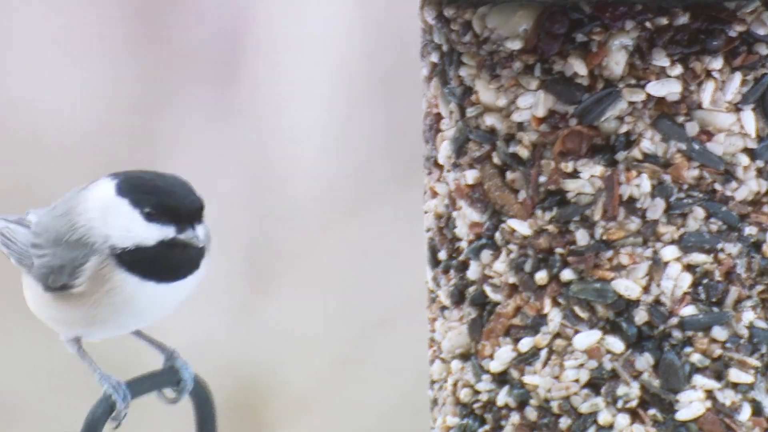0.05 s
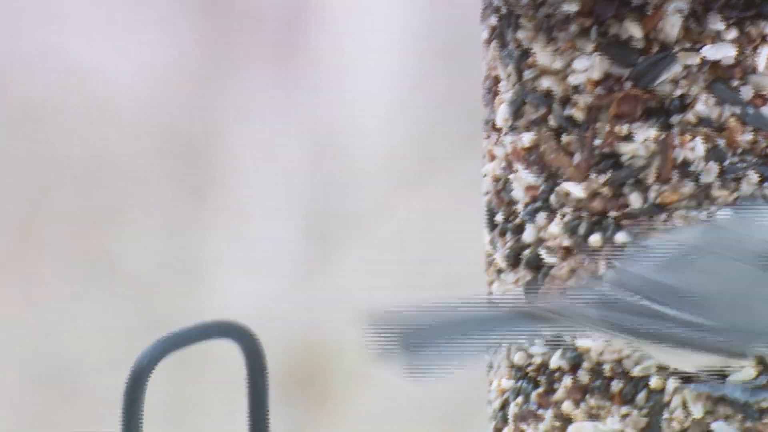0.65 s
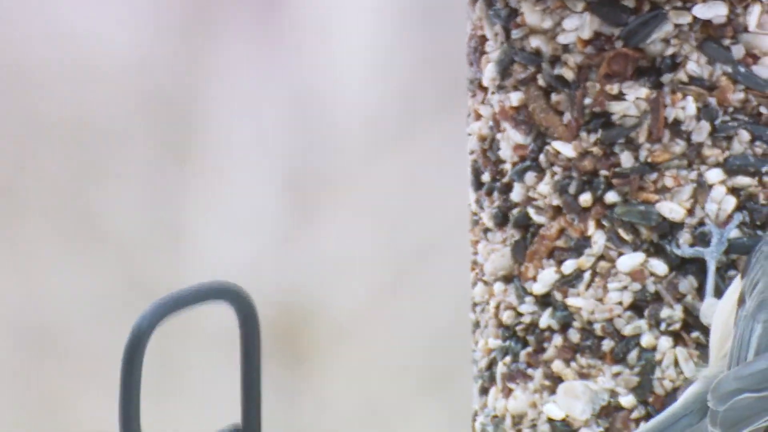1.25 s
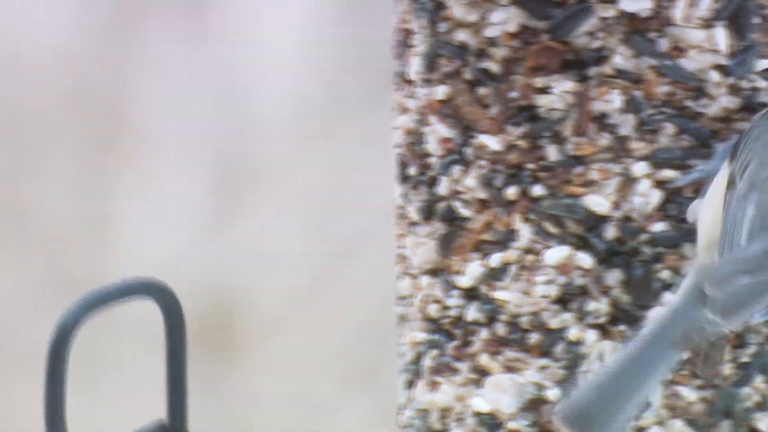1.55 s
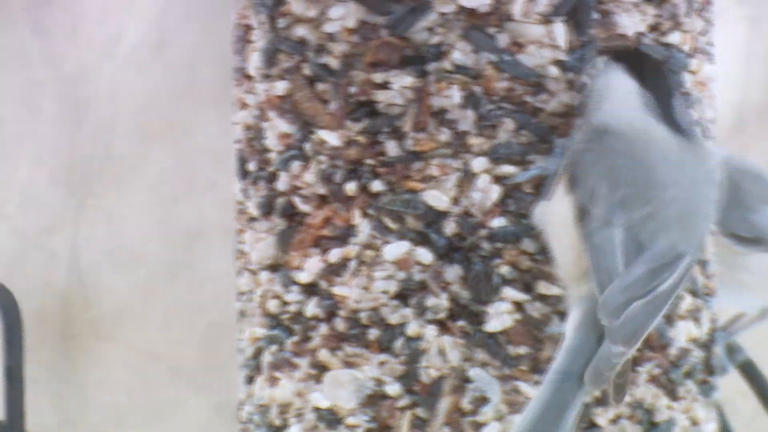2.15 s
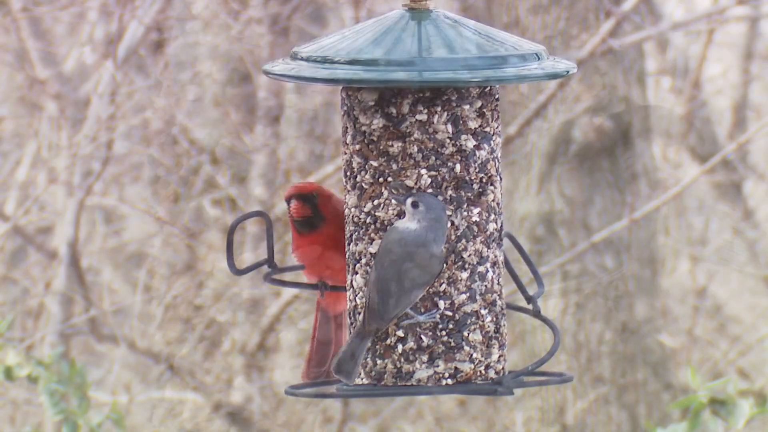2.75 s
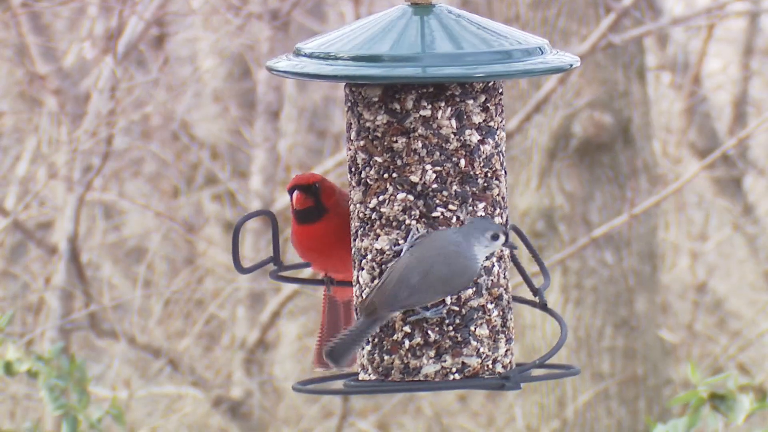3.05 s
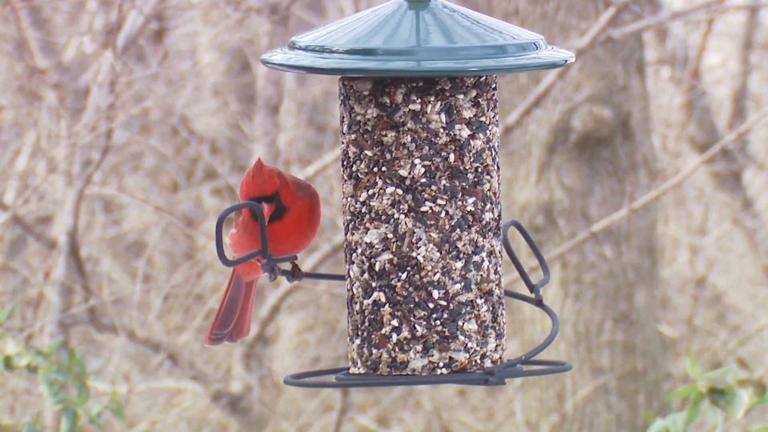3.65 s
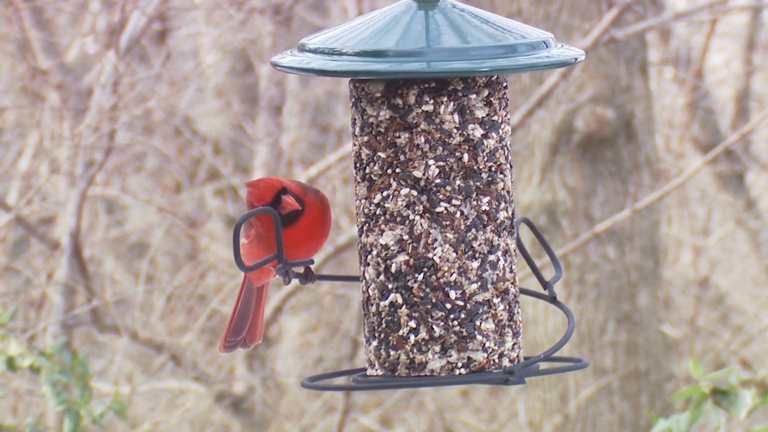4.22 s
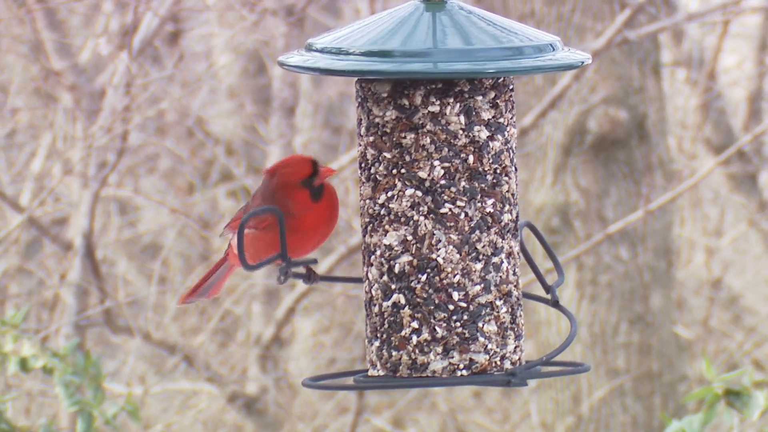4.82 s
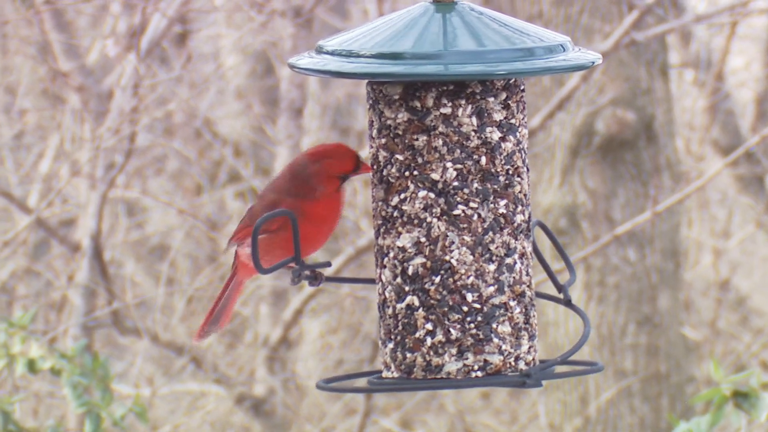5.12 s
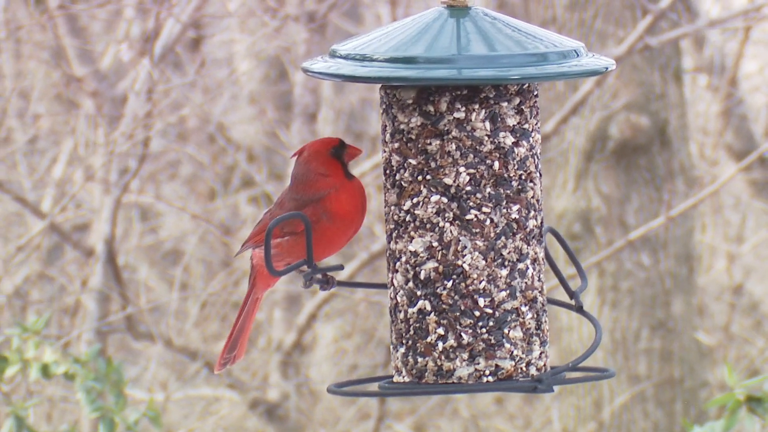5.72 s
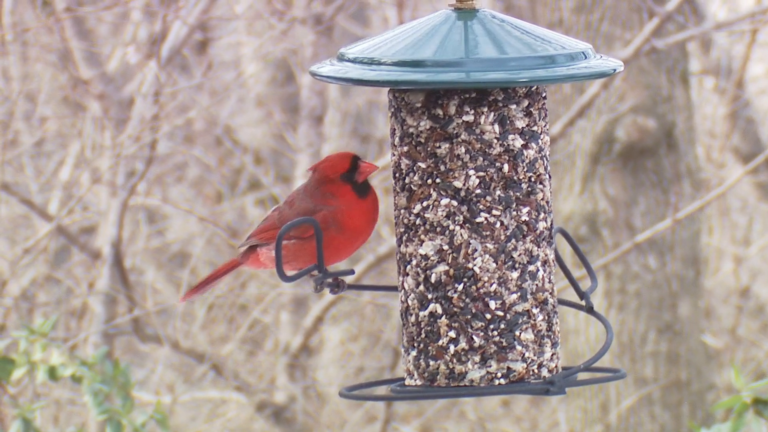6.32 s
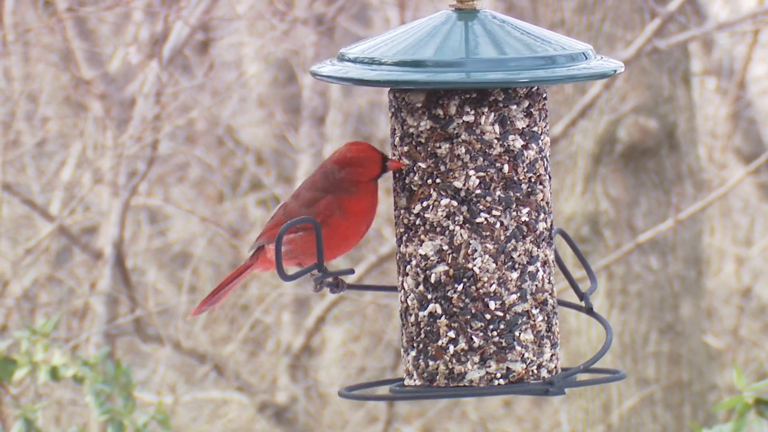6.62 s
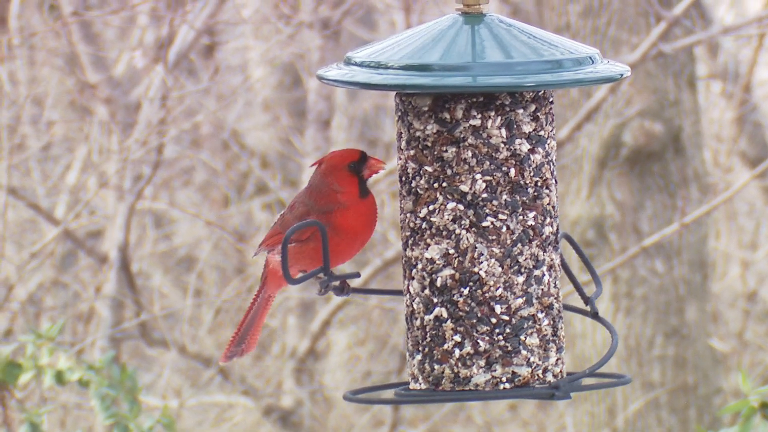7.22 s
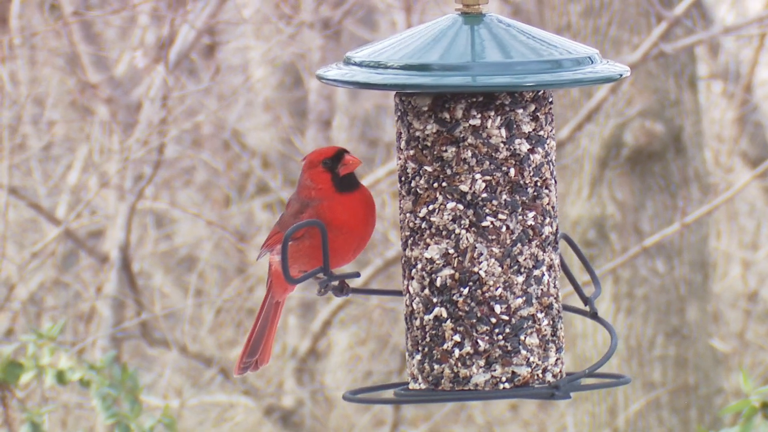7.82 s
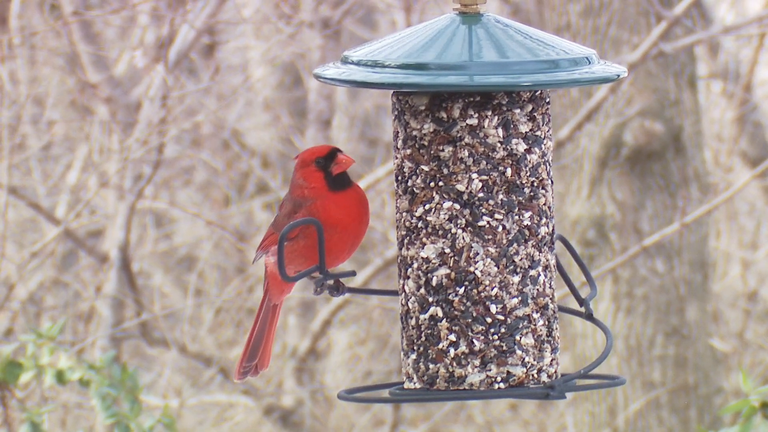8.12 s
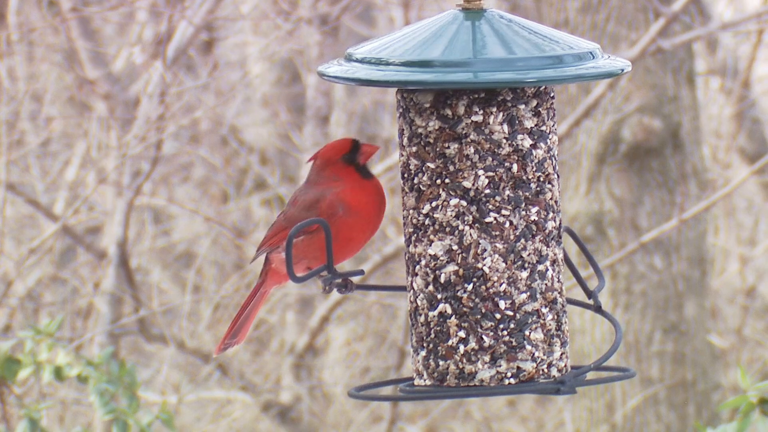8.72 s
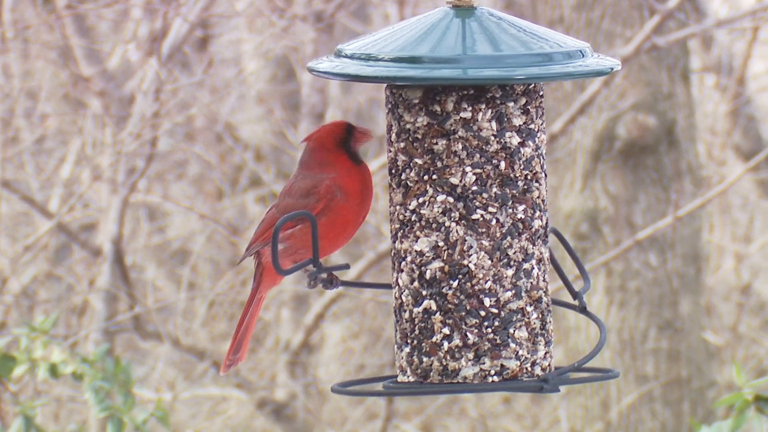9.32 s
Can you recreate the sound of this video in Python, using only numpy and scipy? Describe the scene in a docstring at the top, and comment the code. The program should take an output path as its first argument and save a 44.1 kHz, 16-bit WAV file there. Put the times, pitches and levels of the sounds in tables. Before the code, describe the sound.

A steady, high insect hiss and soft outdoor air sit on the left throughout, while faint whistles, warbles and thin calls echo from a wood. Small birds at a feeder close on the left give sharp, rising chips, strongest at about 1.5, 3.5, 7 and 9 seconds. At 2.5 seconds a nearby chickadee gives one bright arched note and three nasal, buzzy notes. In the centre another bird whistles long, falling mews that flutter into a buzz: once at 1 second, three times between 3.4 and 4.8, and again at 6.4. A beak cracks seeds softly near 1.8 seconds and three times around 5. Three tiny high ticks follow between 5.5 and 6.1. A lower, plain whistle comes from the trees at 7.2 seconds, and a short, faint flutter of wings passes around 9.

```python
"""A garden feeder and a wood: two layers of birdsong, the feeder close on the left, the wood in the centre.
At the feeder sharp rising chips ring through the trees, a chickadee gives one chick-a-dee-dee-dee and
seeds crack, over a steady insect hiss. In the wood a bird whistles long, falling mews that flutter into a
buzz; farther off others warble and whistle, and wings beat near the end. Each bird's voice is a gliding
tone from its syrinx, scattered back by branches and trunks; the wings and seeds are bursts of noise."""
import sys
import numpy as np
from scipy import signal
from scipy.fft import rfft, irfft, next_fast_len
from scipy.io import wavfile
from scipy.ndimage import uniform_filter1d, map_coordinates

SR = 44100
rng = np.random.default_rng(int(sys.argv[2]) if len(sys.argv) > 2 else 0)


def int16_out(signal):
    """Quantize to a 16-bit WAV file."""
    q = np.round(np.clip(np.atleast_2d(signal).T, -1, 1) * 32767)
    wavfile.write(sys.argv[1], SR, q.astype(np.int16))


N = 421596

# partials of the near chips and the far calls: (multiple of the pitch, level [dB])
HIGH_CALL_PARTIALS = [(.5, -23), (1, 3.5), (1.5, -23), (2, -34)]


def amp(db):
    """Decibels to gain."""
    return 10 ** (np.asarray(db) / 20)


def unit(x):
    """Scale to rms 1."""
    return x / np.sqrt(np.mean(x ** 2) + 1e-20)


def along(points, hz):
    """(frequency [Hz], value) points read on a log axis."""
    f, v = np.transpose(points)
    return np.interp(np.log(hz + 1), np.log(f + 1), v)


def clock(length):
    """Sample times of a sound this many seconds long."""
    return np.arange(max(int(length * SR), 2)) / SR


def wobble(rate, size):
    """A smooth random curve, rate knots a second."""
    return map_coordinates(rng.standard_normal(int(size * rate / SR) + 4), [np.arange(size) * rate / SR])


def filtered(x, response):
    """x through a gain that depends on frequency."""
    m = next_fast_len(N + SR // 2)
    return irfft(rfft(x, m) * response(np.fft.rfftfreq(m, 1 / SR)), m)[..., :N]


def noise(spectrum):
    """Noise with a spectrum of (frequency [Hz], density [dB per Hz]) points."""
    return filtered(rng.standard_normal(N) * np.sqrt(SR / 2), lambda hz: amp(along(spectrum, hz)))


def add(track, s, sound):
    """Mix a sound into a track at time s."""
    room = track[max(round(s * SR), 0):][:len(sound)]
    room += sound[:len(room)]


def gate(t, rise, fall):
    """Smooth start and end of a note, in seconds."""
    return np.sin(np.pi / 2 * np.clip(t / rise, 0, 1) * np.clip((t[-1] - t) / fall, 0, 1)) ** 2


def glide(t, start_hz, oct_per_s):
    """A pitch that slides at an even musical speed."""
    return start_hz * 2 ** (oct_per_s * t)


def contour(rows):
    """Time, pitch and level of a note, sample by sample."""
    s, hz, db = np.transpose(rows)
    t = clock(s[-1] - s[0])
    return t, np.interp(t, s - s[0], hz), np.interp(t, s - s[0], db)


def syrinx(hz, partials=((1, 0),)):
    """A tone that follows a pitch curve, pure or with (multiple, level [dB]) partials."""
    phase = 2 * np.pi * np.cumsum(hz) / SR
    return np.sqrt(2) * sum(amp(db) * np.sin(k * phase) for k, db in partials)


def trees(note, echo_db, near_t60=0.67, far_t60=1.0, far_db=-11, delay=0.0049):
    """A note and its scatter: quickly from near branches, slowly from far trunks."""
    t = clock(.6)
    decay = (amp(-60 * t / near_t60) + amp(far_db - 60 * t / far_t60)) * (t > delay)
    tail = rng.standard_normal(len(t)) * decay
    return signal.fftconvolve(note, (t == 0) + amp(echo_db) * tail / np.linalg.norm(tail))


def hush():
    """A faint background hush is faded in early on, then holds."""
    # the full hush: (frequency [Hz], density [dB per Hz])
    spectrum = [(25, -104), (100, -95), (250, -114), (550, -104), (1000, -106), (2400, -106), (3100, -101),
                (4200, -105), (5000, -114), (9000, -119), (15000, -130)]
    fade_db = np.interp(np.arange(N) / SR, [1.5, 3.2], [-7, 0])
    return noise(spectrum) * amp(fade_db)


def air():
    """Steady, low open-air noise around the feeder."""
    # garden air: (frequency [Hz], density [dB per Hz])
    spectrum = [(25, -81), (80, -84), (150, -97.5), (215, -88), (300, -78.5), (460, -77), (580, -83.5),
                (800, -84.5), (1200, -89.5), (2000, -93), (4000, -92), (10000, -103), (12500, -109),
                (15500, -112)]
    return noise(spectrum)


def insects(pitch_hz=5560, pulse_hz=17.7, droop=.065, trill_db=-50, shimmer_db=1.8):
    """A chorus blurs into a shimmering hiss; one nearer insect pulses, each pulse sagging in pitch."""
    # the chorus: (frequency [Hz], density [dB per Hz])
    spectrum = [(3800, -108), (4500, -87.5), (5000, -81), (5500, -76), (6100, -79), (7400, -87.5),
                (8000, -94.5), (9000, -110)]
    # slow drift of all the insects: (time [s], gain [dB])
    swell = [(0, 0), (1.5, 0.5), (2, -1.5), (9.5, -1)]
    hiss = noise(spectrum)
    treble = filtered(hiss, lambda hz: np.clip((hz - 6000) / 700, 0, 1))
    shimmer = treble * (amp(shimmer_db * wobble(20, N)) - 1)
    cycle = np.cumsum(pulse_hz * (1 + 0.0188 * wobble(3.9, N))) / SR % 1
    pulses = np.sin(np.pi * cycle) ** 2 * (1 + .3 * wobble(150, N))
    trill = syrinx(pitch_hz * (1 + droop * (.5 - cycle) + .006 * wobble(200, N))) * pulses
    swell_db = np.interp(np.arange(N) / SR, *np.transpose(swell))
    return amp(swell_db) * (hiss + shimmer + amp(trill_db) * trill)


def warble(db, echo_db, pitch=1, low_hz=3490, high_hz=4610, arch_s=.053, sink=.14, grows_db=6):
    """Two quick, broken arches of pitch that sink and grow louder toward the end."""
    t = clock(2 * arch_s)
    arches = low_hz + (high_hz - low_hz) * np.abs(np.sin(np.pi * t / arch_s))
    hz = pitch * arches * (1 - sink * t / t[-1]) * (1 + .05 * wobble(110, len(t)))
    level = amp(db + grows_db * t / t[-1] + 6.5 * wobble(92.3, len(t)))
    return trees(syrinx(hz) * level * gate(t, 0.044, 0.002), echo_db)


def warblers(chorus_db=-74, count=14):
    """A few clear warbles, and a scatter of lower, fainter ones deep in the wood."""
    # the clear warbles: (time [s], base level [dB])
    notes = [(1.903, -65.5), (5.6, -63.5), (5.75, -67.5), (6.226, -63), (6.63, -66), (7.756, -65),
             (8.409, -70)]
    out = np.zeros(N)
    for s, db in notes:
        add(out, s, warble(db, echo_db=-6))
    for when, pitch, size in rng.random((count, 3)):
        add(out, 3.3 + 6.2 * when, warble(chorus_db + 6 * size, echo_db=0, pitch=.7 + .25 * pitch))
    return out


def twitter(start_s=.43, gap_s=.087, pitch_hz=2354, first_db=-65.5, step_db=0.9, uneven_db=2, count=8):
    """Some way off, an even run of soft low notes grows louder."""
    out, t = np.zeros(N), clock(0.044)
    for k in range(count):
        db = first_db + step_db * k + uneven_db * rng.standard_normal()
        note = syrinx(pitch_hz * (1 + 0.0204 * wobble(44, len(t)))) * amp(db)
        add(out, start_s + k * gap_s, trees(note * gate(t, .01, 0.024), echo_db=-2))
    return out


def whistles(length_s=0.24, sag_hz_per_s=344, waver=0.0048):
    """Plain whistles from the wood, high or an octave lower, that all last as long and sag alike."""
    # nearly level whistles: (time [s], start pitch [Hz], level [dB], echo [dB])
    notes = [(0.109, 3060, -65.5, 0), (1.696, 3097, -62, -2), (2.739, 1607, -61, -6),
             (5.87, 1623, -64.5, 2.5), (5.95, 3090, -60, -9), (7.241, 1602, -47, -8.5),
             (8.346, 3140, -62, 2)]
    out, t = np.zeros(N), clock(length_s)
    for s, pitch_hz, db, echo_db in notes:
        hz = (pitch_hz - sag_hz_per_s * t) * (1 + waver * wobble(300, len(t)))
        note = amp(db) * syrinx(hz, [(1, 0.5), (2, -24.0)])
        add(out, s, trees(note * gate(t, 0.028, .03), echo_db))
    return out


def slurs(oct_per_s=-3.4, rasp=0.0176, echo_db=3):
    """Slightly raspy notes that slide down at one speed, blurred by the wood."""
    # falling slurs: (time [s], length [s], start pitch [Hz], level [dB])
    notes = [(3.241, 0.23, 3620, -60.5), (3.798, 0.13, 3230, -57.5), (4.316, .17, 3250, -56),
             (9.315, .12, 4080, -65), (9.433, 0.14, 3345, -57.5)]
    out = np.zeros(N)
    for s, length, start_hz, db in notes:
        t = clock(length)
        hz = glide(t, start_hz, oct_per_s) * (1 + rasp * wobble(511, len(t)))
        note = amp(db) * syrinx(hz, [(1, 0.5), (2, -28.5)])
        add(out, s, trees(note * gate(t, 0.016, 0.029), echo_db))
    return out


def buzzes(spread=0.074, echo_db=1):
    """Tones with a shaking pitch: one faint, long, high buzz, and four short wheezes of distant birds."""
    # the buzz and the wheezes: (time [s], length [s], pitch [Hz], level [dB])
    notes = [(0.647, 0.062, 3030, -57), (1.092, 0.051, 2880, -55.5), (4.601, 0.9, 4900, -68),
             (4.627, 0.054, 2950, -50.5), (5.039, 0.088, 2750, -56)]
    out = np.zeros(N)
    for s, length, pitch_hz, db in notes:
        t = clock(length)
        note = syrinx(pitch_hz * (1 + spread * wobble(900, len(t)))) * gate(t, length / 12, length / 4)
        add(out, s, trees(amp(db) * note, echo_db))
    return out


def far_seets(db=-52, spread_db=6, echo_db=7, count=36):
    """Many faint rising seets from birds waiting back in the trees."""
    out, t = np.zeros(N), clock(0.081)
    for when, pitch, size in rng.random((count, 3)):
        hz = (6020 + 680 * pitch) * (1 + .18 * t / t[-1])
        note = amp(db - echo_db + spread_db * size) * syrinx(hz) * np.hanning(len(t))
        add(out, when * N / SR, trees(note, echo_db))
    return out


def far_calls(rise=0.0626, waver=0.0276, echo_db=12):
    """Thin, quavering, slightly rising notes that reach the microphone mostly as echo off the trunks."""
    # distant calls: (time [s], length [s], middle pitch [Hz], level of the echo [dB])
    notes = [(0.017, 0.14, 7650, -52), (0.626, 0.13, 7560, -53), (1.163, 0.079, 7740, -50.5),
             (1.325, .11, 8080, -49.5), (2.086, 0.14, 7180, -43), (3.13, 0.14, 8000, -57),
             (3.992, 0.046, 7600, -50), (8.213, .18, 7500, -56), (8.643, 0.051, 7000, -45),
             (9.511, .045, 7620, -45.5)]
    out = np.zeros(N)
    for s, length, pitch_hz, db in notes:
        t = clock(length)
        quaver = np.sin(2 * np.pi * np.cumsum(70 + 20 * wobble(62.1, len(t))) / SR)
        hz = pitch_hz * (1 + rise * (t / length - .5) + waver * (quaver + wobble(401.3, len(t))))
        note = amp(db - echo_db) * syrinx(hz, HIGH_CALL_PARTIALS)
        add(out, s, trees(note * gate(t, 0.0045, 0.043), echo_db, far_db=-19))
    return out


def wings(start_s=8.81, beat_s=0.0636, count=6, crest=0.47, crest_db=-54, t60=0.33, rise=0.018):
    """A short flight swells and fades: each beat is a puff of air, and feathers rustle between beats."""
    # air through feathers: (frequency [Hz], relative level [dB])
    spectrum = [(600, -18), (1150, 2.5), (2600, 8), (3400, 10), (4200, -39), (5200, -12), (7000, -41)]
    puffs, t = np.zeros(N), clock(0.33)
    for k, place in enumerate(np.linspace(-1, 1, count)):
        db = crest_db - 3 * (place - crest) ** 2
        add(puffs, start_s + k * beat_s - rise, amp(db - 60 * t / t60) * gate(t, rise, .05))
    rustle = amp(-3) * uniform_filter1d(puffs, SR // 10)
    flicker = amp(3.5 * wobble(200, N))
    return (puffs + rustle) * flicker * unit(noise(spectrum))


def pecks(t60=0.11, rise=.004):
    """At the feeder a beak cracks a seed with a short, bright scrape."""
    # beaks on seed: (time [s], level before the seed's colour [dB])
    strikes = [(1.833, -51), (4.63, -51), (4.856, -45.5), (5.08, -52)]
    # colour of a cracking seed: (frequency [Hz], gain [dB])
    seed = [(1000, -8), (4000, 10), (9000, 9), (12000, -7), (15000, -22)]
    out, t = np.zeros(N), clock(.05)
    for s, db in strikes:
        scrape = amp(db - 60 * t / t60) * gate(t, rise, .01) * rng.standard_normal(len(t))
        add(out, s, trees(scrape, echo_db=-4))
    return filtered(out, lambda hz: amp(along(seed, hz)))


def ticks(length_s=0.016, start_hz=8030, oct_per_s=-22, echo_db=-18):
    """Tiny downward flicks from a bird at the feeder, close and nearly dry."""
    # thin ticks: (time [s], level [dB])
    notes = [(5.509, -40), (5.887, -42.5), (6.114, -41)]
    out, t = np.zeros(N), clock(length_s)
    for s, db in notes:
        note = syrinx(glide(t, start_hz, oct_per_s) * (1 + .008 * wobble(500, len(t))))
        add(out, s, trees(amp(db) * note * gate(t, .004, .008), echo_db))
    return out


def chickadee(dee_hz=439.4, dee_db=-38, scoop=0.14, scoop_s=.016, jitter=0.0079, hoarse=0.18):
    """Close by, one arched note, then three nasal dees: harmonic stacks that start hoarse and slide up."""
    # the arched first note: (time [s], pitch [Hz], level [dB])
    chick = [(2.542, 3280, -51), (2.5465, 6250, -28.5), (2.55, 6870, -35), (2.556, 7400, -30.5),
             (2.573, 6630, -31.5), (2.579, 6650, -22), (2.587, 6180, -18.5), (2.595, 5430, -28),
             (2.599, 3400, -52)]
    # the nasal notes: (time [s], length [s])
    dees = [(2.647, 0.098), (2.785, .11), (2.942, .11)]
    # resonance of the throat: (frequency [Hz], gain [dB])
    throat = [(1300, -42), (1760, -27), (2200, -22), (3080, -23), (3520, -13.5), (3960, -3.5), (4400, -8.5),
              (4840, -3.5), (5280, -5), (5720, -18), (6160, -7), (7000, -34), (9000, -34)]
    out = np.zeros(N)
    t, hz, db = contour(chick)
    note = syrinx(hz, [(1, 2), (1.57, -29), (2.1, -45)]) * amp(db + wobble(400, len(t)))
    add(out, chick[0][0], trees(note * gate(t, .001, .001), echo_db=-14.5))
    for s, length in dees:
        t = clock(length)
        settling = np.exp(-t / scoop_s)
        hz = dee_hz * (1 - scoop * settling + jitter * (1 + 5 * settling) * wobble(517, len(t)))
        phase = 2 * np.pi * np.cumsum(hz) / SR
        stack = np.zeros(len(t))
        for k in range(3, 20):  # the harmonics are not in step, so the buzz is smooth rather than spiky
            harmonic = np.sqrt(2) * np.sin(k * phase + 2 * np.pi * rng.random())
            stack += amp(along(throat, k * dee_hz)) * harmonic * (1 + hoarse * wobble(457, len(t)))
        add(out, s, trees(amp(dee_db - 4 * settling) * stack * gate(t, .004, .014), echo_db=-17))
    return out


def chips(start_share=.7, bend=2.38, swell_db=5):
    """Fast upward sweeps near the microphone that swell, level off and ring on in the branches."""
    # rising chips: (time [s], length [s], end pitch [Hz], base level [dB], echo [dB])
    notes = [(0.959, 0.042, 7600, -38.5, -6), (1.546, .029, 7940, -25.5, 4.5),
             (3.457, 0.027, 8020, -15, -2), (4.32, 0.035, 7580, -45, 4), (5.746, .04, 7700, -44.5, -4),
             (6.313, 0.022, 7500, -44.5, 8.5), (6.388, .029, 7700, -39, 11.5),
             (7.02, 0.028, 8130, -23.5, 6), (7.983, 0.032, 7800, -44, -14), (8.974, .026, 7716, -28.5, 8.5)]
    out = np.zeros(N)
    for s, length, end_hz, db, echo_db in notes:
        t = clock(length)
        sweep = (1 - np.exp(-bend * t / length)) / (1 - np.exp(-bend))
        hz = end_hz * (start_share + (1 - start_share) * sweep) * (1 + 0.012 * wobble(522, len(t)))
        note = amp(db + swell_db * (sweep - 1.73)) * syrinx(hz, HIGH_CALL_PARTIALS)
        add(out, s, trees(note * gate(t, 0.0013, 0.0067), echo_db, near_t60=0.16, far_t60=0.57, far_db=-3))
    return out


def flutter(t, hz, rate_hz=235, slowing=.55, depth=0.033, throb=0.28, rasp_db=-31):
    """The mew's voice: a flutter in the syrinx shakes pitch and level, deepening and then slowing."""
    # the whistle and its side tones: (multiple of the pitch, level [dB])
    partials = [(.25, -38), (.5, -14.5), (.75, -25.5), (1, 2), (1.25, -34), (1.5, -24.5), (1.75, -38)]
    progress = t / t[-1]
    rate = rate_hz * (1 - slowing * progress ** 4) * (1 + .055 * wobble(120, len(t)))
    cycle = 2 * np.pi * np.cumsum(rate) / SR
    strain = np.clip(4.6 * t - .25, .06, 1) * amp(1.3 * wobble(110, len(t)))
    shake = strain * (depth * np.sin(cycle) + .009 * wobble(450, len(t)))
    tone = syrinx(hz * (1 + shake + .003 * wobble(100, len(t))), partials)
    tone *= 1 - throb * strain * np.sin(cycle + 0.91)
    return tone * (1 + amp(rasp_db) * (1 + 2 * progress) * wobble(2200, len(t)))


def mews(low_hz=2934, sag_share=.45, scoop_s=0.01813, flick_hz=420, flick_s=.02, opening_s=0.2):
    """Close and in the centre, whistles that scoop up, sag, drop and flick down, swelling on the way."""
    # mews: (time [s], length [s], pitch aimed at [Hz], opening [dB], swell [dB], swell's crest [0-1])
    notes = [(1.052, 0.43, 3463, -52, -44.5, .93), (3.403, .428, 3482, -41.5, -37.5, 0.82),
             (3.925, 0.3, 3143, -41.5, -38, 0.5), (4.33, .422, 3467, -38.5, -38.5, 0.95),
             (6.363, 0.3, 3130, -37, -33, 0.54)]
    out = np.zeros(N)
    for s, length, top_hz, opening_db, swell_db, crest in notes:
        t = clock(length)
        progress = t / t[-1]
        scoop = 0.603 * np.exp(-t / scoop_s)
        fall = sag_share * progress ** 1.5 + (1 - sag_share) * progress ** 7
        flick = np.clip(1 + (t - t[-1]) / flick_s, 0, 1)
        hz = top_hz + (low_hz - top_hz) * (scoop + fall) - flick_hz * flick
        opening = amp(opening_db) * np.exp(-t / opening_s)
        swell = amp(swell_db) * np.exp(-((progress - crest) / 0.45) ** 2)
        dip = amp(-2.5 * np.exp(-((t - .054) / 0.012) ** 2))  # the level dips briefly after the opening
        note = flutter(t, hz) * np.hypot(opening, swell) * dip
        add(out, s, trees(note * gate(t, 0.021, .028), echo_db=-20))
    return out


def scene():
    """Two layers: the feeder in the left channel only, the woodland birds and hush in both alike."""
    left = chips() + ticks() + chickadee() + far_calls() + far_seets() + pecks() + insects() + air()
    centre = hush() + mews() + whistles() + slurs() + warblers() + twitter() + buzzes() + wings()
    return np.array([centre + left, centre])


def record(dry):
    """The recorder keeps nothing above its band limit."""
    return filtered(dry, lambda hz: hz < 15780)


dry = scene()
out = record(dry)
int16_out(out)
```